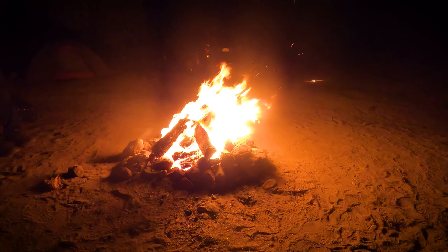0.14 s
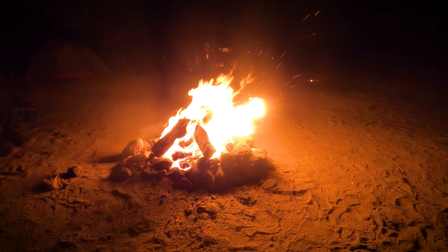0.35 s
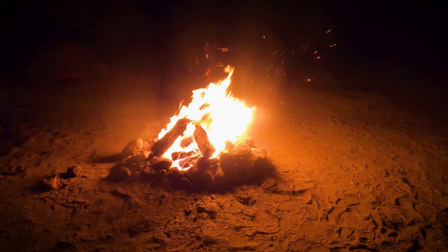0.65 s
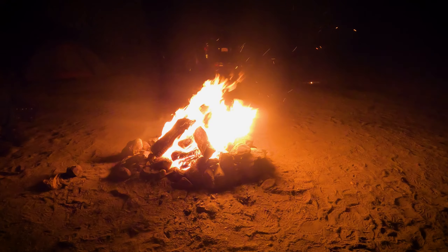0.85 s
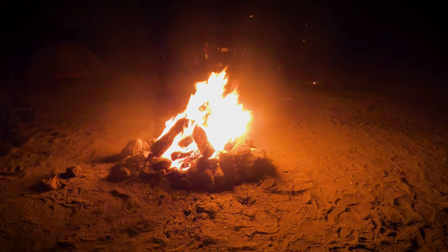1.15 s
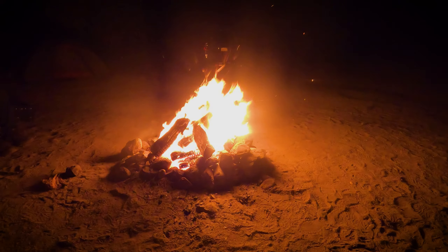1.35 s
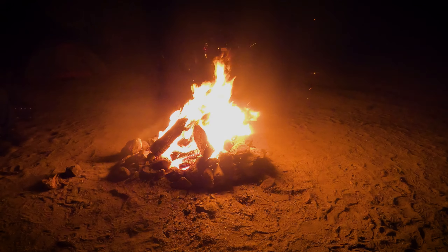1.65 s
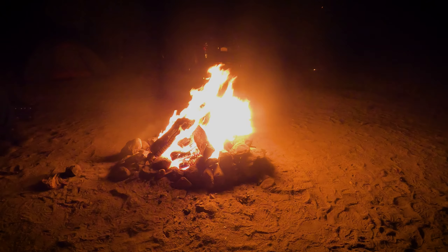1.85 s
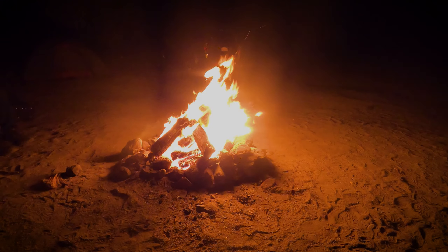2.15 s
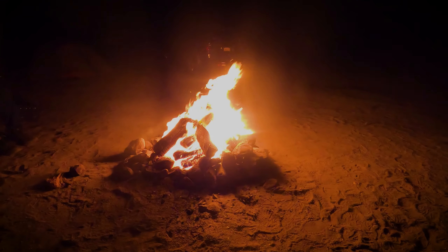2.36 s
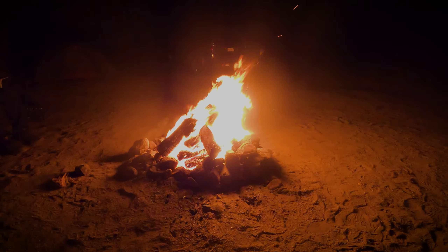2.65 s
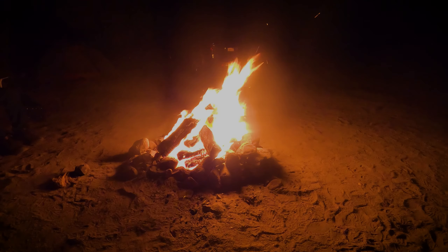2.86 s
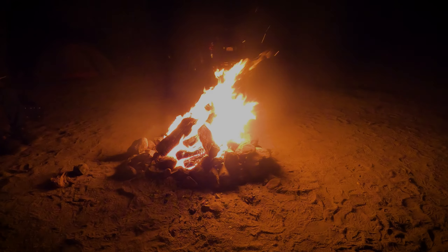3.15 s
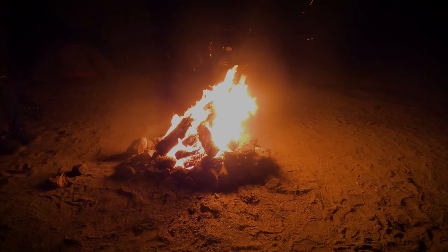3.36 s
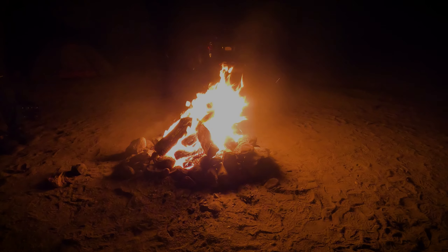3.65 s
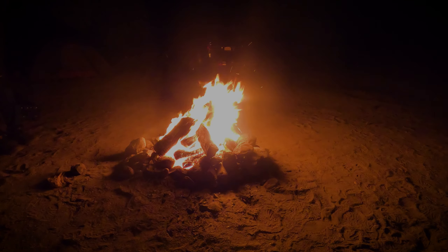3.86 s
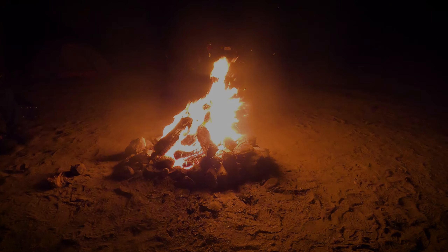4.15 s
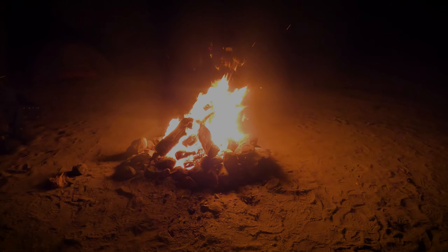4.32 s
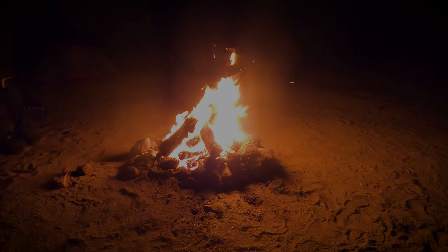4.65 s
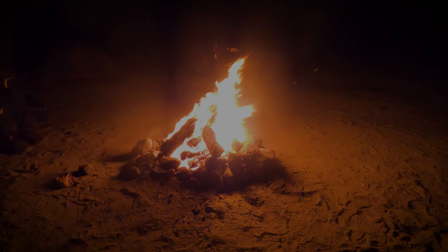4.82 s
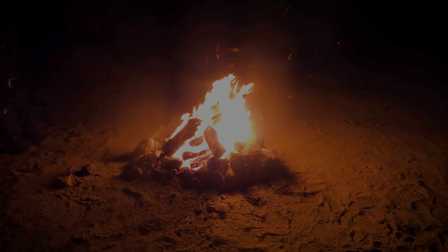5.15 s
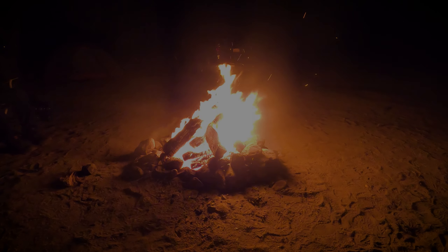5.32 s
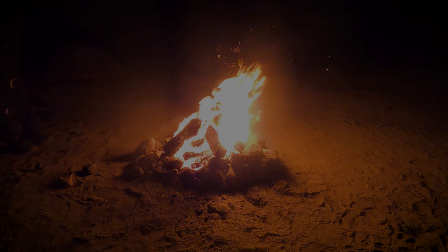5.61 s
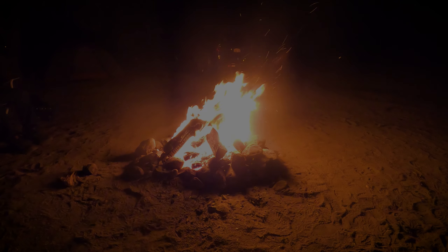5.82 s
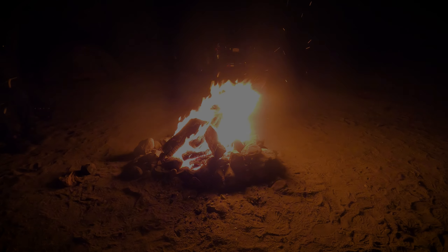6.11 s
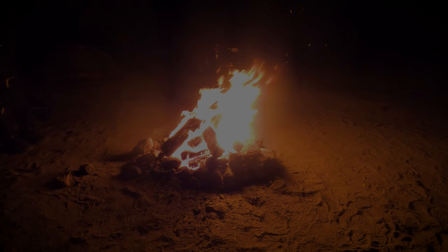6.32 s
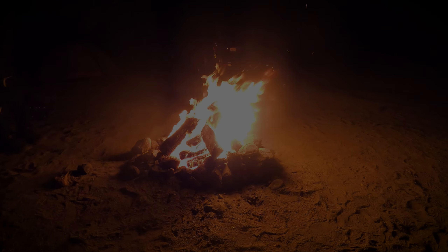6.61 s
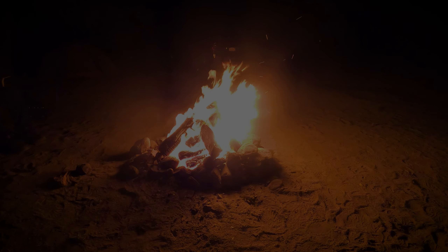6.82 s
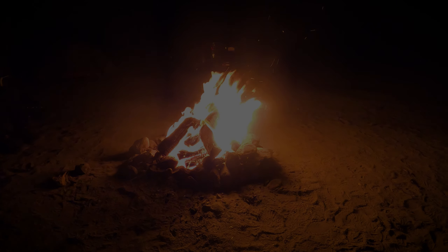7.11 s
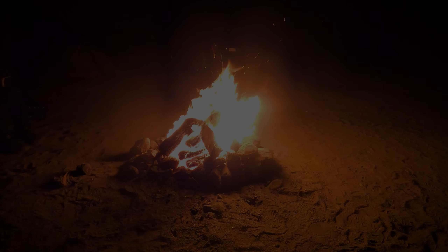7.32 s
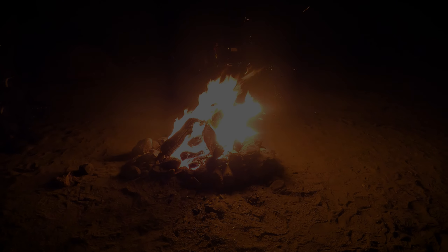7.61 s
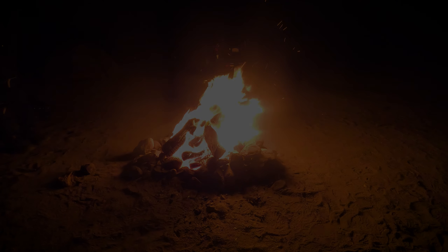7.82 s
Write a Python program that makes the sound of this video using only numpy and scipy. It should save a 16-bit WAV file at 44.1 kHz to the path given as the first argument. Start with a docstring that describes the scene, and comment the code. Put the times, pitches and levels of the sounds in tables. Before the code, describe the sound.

A wood campfire burns outdoors, heard by a small close microphone. Low, gently swelling flame rumble runs throughout with a much fainter roar and thin hiss full of tiny ticks. One loud, bright pop cracks near the start, then only small ticks follow as the flames slowly fade. Just past five seconds several hard pops crowd together, with a low thump of air on the microphone, and a few more come near seven.

```python
"""A wood campfire outdoors, heard by a small microphone: rumble, roar, hiss and faint ticks run throughout.
Steam bursts in the logs: a strong pop comes early, then a slow fade-out begins, applied here to flames and
faint ticks. Small ticks follow, then a crowd of strong pops just after five seconds and a few more later.
Each pop is a sudden push ringing in five bands, with scattered echoes; the flames are coloured noise.
Moving air pushes the microphone with very low noise, and shoves it once during the crowd of pops."""
import sys
import numpy as np
from scipy import signal
from scipy.fft import rfft, irfft, next_fast_len
from scipy.io import wavfile
from scipy.ndimage import uniform_filter1d, map_coordinates

SR = 44100
rng = np.random.default_rng(int(sys.argv[2]) if len(sys.argv) > 2 else 0)


def unload_audio(sound):
    """Save the sound as a 16-bit wav file, at the path given as the first command line argument."""
    columns = np.transpose(np.atleast_2d(sound))
    # keep every value between -1 and 1, then stretch to whole-number steps
    steps = np.round(np.clip(columns, -1, 1) * 32767)
    wavfile.write(sys.argv[1], SR, steps.astype(np.int16))


N = 351477  # length of the sound [samples]

# Bursts in the logs, from big pops to ember ticks; the level is taken before it is shared among the rings:
# (time [s], level over 10 ms [dB], centre of the sound [Hz], spread [octaves], extra level of crack ring [dB])
BURSTS = [(0.0574, -46.5, 8780, 1, -3.5), (0.1943, -58, 15290, 1.8, 0), (0.2158, -48, 16380, 1.6, 3.5),
          (0.316, -61.3, 16380, 2.2, -8), (0.3348, -56, 4390, 0.7, -9), (0.359, -57, 960, 1.8, 2),
          (0.4542, -19.5, 1180, 1.04, 7.5), (0.8953, -51, 6210, 1.2, -0.5),
          (0.9476, -56.6, 4390, 0.86, 4.5), (1.573, -50.5, 16380, 2, 5), (1.6037, -35.5, 15290, 1.7, 2),
          (1.611, -46.5, 5400, 1.5, 3), (1.6349, -59.3, 7130, 1.1, -4), (1.9119, -60, 8190, 2.6, -3),
          (2.2448, -44, 3660, 0.68, -13), (2.3487, -65, 16380, 1.9, -4), (2.3644, -56.0, 10090, 2.3, 2),
          (2.374, -58, 13310, 1.4, -3), (2.5604, -58.5, 7130, 1, -7), (2.5845, -55.5, 3570, 0.84, -6),
          (2.6806, -54.5, 16380, 1.3, 1), (2.742, -56.5, 16380, 1.2, -8), (2.8238, -43, 3280, 0.73, -5.5),
          (2.984, -60.2, 4100, 2.8, -7), (3.02, -60.5, 15290, 3.0, 0), (3.0732, -56.8, 16380, 1.4, -7),
          (3.1525, -55.2, 16380, 1, -11), (3.2879, -60.5, 15290, 1.6, 6.5), (3.5076, -53.5, 830, 2.3, 2),
          (3.752, -62, 16380, 2.2, -5), (3.839, -58, 16300, 1.7, -2), (3.8468, -50.1, 16380, 2.1, 2),
          (4.2051, -57.5, 4100, 1.7, 4.5), (4.3892, -61, 16380, 1.7, -8), (4.57, -61, 12420, 2.5, -5),
          (4.701, -47.5, 360, 2.4, 4), (4.8573, -43, 3130, 2, -4.5), (4.883, -54, 4100, 0.76, -9),
          (4.9189, -32.5, 1030, 1.43, -11), (5.003, -52.5, 5790, 0.8, -11), (5.0373, -24, 1780, 1.17, 6.5),
          (5.2117, -53, 4100, 0.6, -5), (5.2393, -51, 4100, 0.8, -6), (5.26, -27, 1580, 1.21, 6.5),
          (5.3984, -50.5, 5040, 1.5, -1.5), (5.4318, -39, 2080, 1.31, -4.5),
          (5.5364, -25, 1120, 1.73, -6.5), (5.615, -54, 12420, 1.8, -1), (5.6295, -31.5, 1830, 1.1, 3),
          (5.6378, -47.6, 1550, 2, -1), (6.5837, -51, 4100, 2.1, -1.5), (6.6974, -33.5, 3120, 1.28, 7),
          (6.821, -22, 1450, 1.06, 2.5), (7.1123, -47, 6200, 0.7, -3.5), (7.405, -37, 16200, 1.8, 1.5),
          (7.8422, -54.5, 3600, 0.7, -10)]
# What a burst rings, in order thump, knock, crack, snap, fizz: (low edge [Hz], high edge [Hz], puff time [ms])
RINGS = [(171.7, 486, 0.55), (983, 2320, .4), (3170, 5100, 0.3), (7400, 10060, .2), (10400, 13900, 0.089)]
# How readily each of the five rings sounds: (level [dB])
RING_READINESS = [1.47, 0.39, -1, 1.1, 1.8]
# Echoes from objects round the fire: (delay [s], spread [s], level relative to the others [dB])
ECHOES = [(.009, 0.012, 5), (.019, 0.0018, -5.5), (0.026, 0.0047, -3), (.033, 0.0023, -11),
          (.041, 0.0052, 1), (0.046, 0.0028, -9), (.054, .005, -12.5), (.070, 0.0015, -5),
          (0.083, 0.00063, -12), (0.074, .02, -17)]
# The band in which each ring echoes: (low edge [Hz], high edge [Hz], extra level [dB])
ECHO_BANDS = [(200.5, 340, 4), (900, 1500, -2), (2365, 4960, 7.5), (5430, 9200, 2), (8130, 11000, 9)]
# How hard the flames burn, heard in rumble and roar: (time [s], level [dB])
BLAZE = [(0.0, -2.5), (0.7, 0), (1.5, -1.5), (2.6, -1), (3.5, 2), (4.3, -.5), (5.3, 1), (6.2, -0.5),
         (7.0, 1), (7.97, -1.5)]
# Colour of the low flame rumble: (frequency [Hz], relative level per Hz [dB])
RUMBLE_COLOUR = [(26, -7.5), (33, 0.5), (43, -0.5), (57, -9.5), (70, -7), (85, -7), (100, -11.5),
                 (120, -9.4), (135, -12.5), (155, -9.5), (180, -13), (230, -16), (290, -22), (350, -25.5)]
# Colour of the middle flame roar: (frequency [Hz], relative level per Hz [dB])
ROAR_COLOUR = [(350, 1.5), (450, -4), (600, -5), (800, -5), (1100, -8), (1500, -11), (2000, -11)]
# Colour of the high flame hiss: (frequency [Hz], relative level per Hz [dB])
HISS_COLOUR = [(2000, 1.5), (3000, -0.5), (4400, -1.2), (6500, -3.5), (9000, -3.5), (12500, -3.5),
               (15000, -3), (15700, -11.5), (16000, -17), (16400, -46)]
# How strongly moving air pushes the microphone: (time [s], level [dB])
AIR_PUSH = [(0.0, -31.5), (1.31, -28.5), (1.9, -32.5), (2.2, -36), (2.4, -35.5), (3.2, -40), (3.7, -26),
            (3.91, -41), (4.71, -33), (5.01, -45), (5.52, -29), (5.88, -43.5), (6.57, -34), (7.3, -45.5),
            (7.66, -37.5), (7.97, -53)]
# Colour of the moving air: (frequency [Hz], relative level per Hz [dB])
AIR_COLOUR = [(2, -10), (5, -4), (10, 1.5), (16, -8.5), (21, -11.5), (26, -20.5)]

ECHO_DB = -26.5  # base level of the echoes against the burst, before the extra level of each band
# Strong bursts begin with a harder rupture: burst levels [dB] and rupture strengths at the two ends
SOFT_DB, SHARP_DB, SOFT_RUPTURE, SHARP_RUPTURE = -50.5, -41, 0.6, 1.7
RUMBLE_DB, ROAR_DB, HISS_DB = -41.5, -58.5, -59.5  # base levels, before blaze and fade-out
ROAR_SHARE = 0.48  # the roar follows the blaze less than the rumble does
FADE_FROM_S, FADE_TO_S = 0.94, 14.8  # fade-out in a straight line towards silence, beyond the end
SHOVE_S, SHOVE_DB, SHOVE_WIDTH_S = 5.54, -16.5, 0.01  # width is from the peak to half of it
TOP_HZ = 16800  # the recorder cuts what lies above


def pops():
    """Steam bursts in the logs: each sounds all five rings, most those near its centre, and their echoes."""
    times, burst_db, centre_hz, spread, crack_db = np.transpose(BURSTS)
    rupture = np.interp(burst_db, [SOFT_DB, SHARP_DB], [SOFT_RUPTURE, SHARP_RUPTURE])
    ring_db = []
    for (low_hz, high_hz, _), readiness in zip(RINGS, RING_READINESS):
        octaves_away = np.log2(np.sqrt(low_hz * high_hz) / centre_hz)
        ring_db.append(burst_db + readiness - 3 * (octaves_away / spread) ** 2)
    ring_db[2] = ring_db[2] + crack_db  # the third ring is the crack

    direct = 0
    for ring, db in zip(RINGS, ring_db):
        direct = direct + undb(db)[:, None] * bursts(*ring, count=len(times), rupture=rupture)
    echoed = 0
    for band, db in zip(ECHO_BANDS, ring_db):
        echoed = echoed + np.outer(undb(db + ECHO_DB), echoes(*band))
    return place(times, direct) + place(times, echoed)


def bursts(low_hz, high_hz, puff_ms, count, rupture, tail_db=-19, tail_ms=6.1):
    """A rupture, a puff of gas and settling splinters, heard through one ring; each row has rms 1 over 10 ms."""
    ms = np.arange(1024) * 1000 / SR
    puff = (ms / puff_ms) * np.exp(1 - ms / puff_ms)
    splinters = undb(tail_db) * np.exp(-ms / tail_ms)
    push = (puff + splinters) * rng.standard_normal((count, len(ms)))
    # the rupture is a single sharp click at the height of the puff
    puff_samples = puff_ms * SR / 1000
    push[:, int(puff_samples)] -= rupture * np.sqrt(puff_samples)
    ring = signal.butter(2, [low_hz, high_hz], "band", fs=SR, output="sos")
    sound = signal.sosfilt(ring, push)
    return sound / np.sqrt(np.sum(sound ** 2, axis=1, keepdims=True) * 100 / SR)


def echoes(low_hz, high_hz, db):
    """Scattered returns from every object in one band; total energy equals 10 ms at the given level."""
    t = np.arange(SR // 5) / SR
    strength = 0
    for delay, spread, echo_db in ECHOES:
        strength = strength + undb(echo_db) * np.exp(-0.5 * ((t - delay) / spread) ** 2)
    # rough surfaces return the sound in separate specks
    specks = undb(3.5 * uniform_filter1d(rng.standard_normal(len(t)), size=36) * 5.2)
    scattered = strength * specks * rng.standard_normal(len(t))
    band = signal.butter(2, [low_hz, high_hz], "band", fs=SR)
    sound = signal.lfilter(*band, scattered)
    return undb(db) * sound / np.sqrt(np.sum(sound ** 2) * 100 / SR)


def faint_ticks(count=300, base_db=-18, colour_db=4):
    """A dense scatter of tiny bursts in the four upper rings, a few louder; levels are against the hiss."""
    when, size = rng.random((count, 2)).T
    tick_db = base_db - 3.1 * np.log(size + 0.015)  # the smallest draws give the few loud ticks
    ring_db = tick_db + colour_db * rng.standard_normal((count, 4)).T
    ticks = 0
    for ring, db in zip(RINGS[1:], ring_db):
        ticks = ticks + undb(db)[:, None] * bursts(*ring, count=count, rupture=SOFT_RUPTURE)
    return place(when * N / SR, ticks)


def flame_rumble(blaze):
    """The low sound of the flames: noise that swells fully with the blaze."""
    return undb(RUMBLE_DB) * blaze * noise(RUMBLE_COLOUR, flicker_db=1.0, rate=9)


def flame_roar(blaze):
    """The middle sound of the flames: noise that swells only partly with the blaze."""
    return undb(ROAR_DB) * blaze ** ROAR_SHARE * noise(ROAR_COLOUR, flicker_db=0.474, rate=13)


def hiss_and_ticks():
    """The high hiss of the flames, noise with a quick flicker, sprinkled with faint ticks."""
    return undb(HISS_DB) * (noise(HISS_COLOUR, flicker_db=0.45, rate=25) + faint_ticks())


def moving_air():
    """Air pushes the microphone: very low noise that swells and sinks, plus one sudden shove of pressure."""
    air = curve(AIR_PUSH) * noise(AIR_COLOUR, flicker_db=0.4, rate=2.96)
    widths_away = (np.arange(N) / SR - SHOVE_S) / SHOVE_WIDTH_S
    return air + undb(SHOVE_DB) / (1 + widths_away ** 2)


def noise(colour, flicker_db, rate):
    """Noise shaped by its level at each frequency, with a randomly flickering level; overall rms 1."""
    colour_hz, colour_db = np.transpose(colour)
    n = next_fast_len(N)
    hz = np.arange(1, n // 2 + 2) * SR / n
    gain = undb(np.interp(np.log(hz), np.log(colour_hz), colour_db))
    gain = gain * (hz > colour_hz[0]) * (hz <= colour_hz[-1])  # silent outside the table
    sound = irfft(rfft(rng.standard_normal(n)) * gain, n)[:N]
    sound = sound * undb(flicker_db * walk(rate))
    return sound / np.sqrt(np.mean(sound ** 2))


def walk(rate):
    """Random levels joined smoothly, this many a second, with a spread of 1."""
    levels = rng.standard_normal(size=1000)
    path = map_coordinates(levels, [np.arange(N) * rate / SR], order=3)
    return path / path.std()


def curve(rows):
    """Gain at every sample, joining the levels of a table with straight lines in dB."""
    times, db = np.transpose(rows)
    return undb(np.interp(np.arange(N) / SR, times, db))


def place(times, sounds):
    """A track with each sound added at its moment."""
    track = np.zeros(N + sounds.shape[1])
    for time, sound in zip(times, sounds):
        track[int(time * SR):][:len(sound)] += sound
    return track[:N]


def undb(db):
    """Turn decibels into gain."""
    return 10 ** (np.asarray(db) / 20)


def scene():
    """Pops, flames, ticks and moving air; the fade-out is applied to flames and ticks, other levels are as heard."""
    fade_out = np.clip((FADE_TO_S - np.arange(N) / SR) / (FADE_TO_S - FADE_FROM_S), 0, 1)
    blaze = curve(BLAZE)
    flames_and_ticks = flame_rumble(blaze) + flame_roar(blaze) + hiss_and_ticks()
    return (pops() + fade_out * flames_and_ticks + moving_air())[None]


def record(dry):
    """The recorder gently rounds the loudest peaks and cuts the highest treble."""
    rounded = np.tanh(0.8 * dry) / 0.8
    top_cut = signal.ellip(10, 0.2, 80, TOP_HZ, fs=SR, output="sos")
    return signal.sosfilt(top_cut, rounded)


dry = scene()
out = record(dry)
unload_audio(out)
```